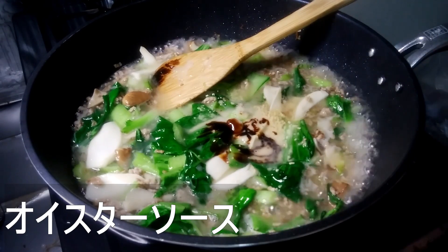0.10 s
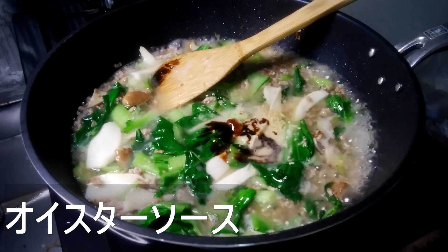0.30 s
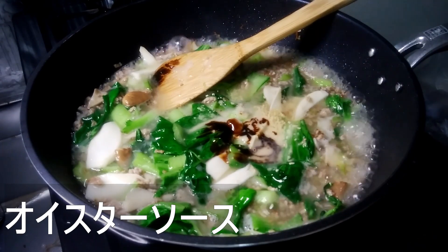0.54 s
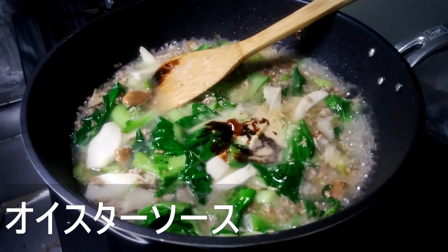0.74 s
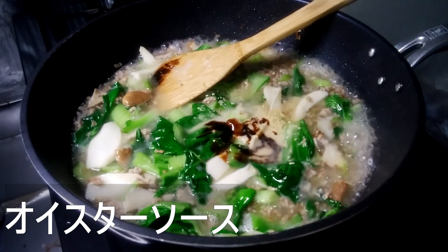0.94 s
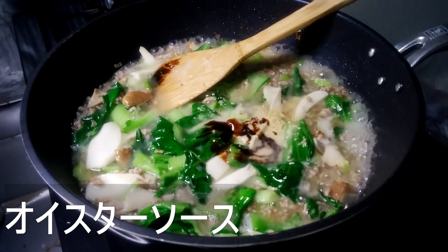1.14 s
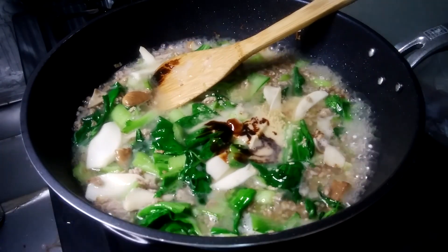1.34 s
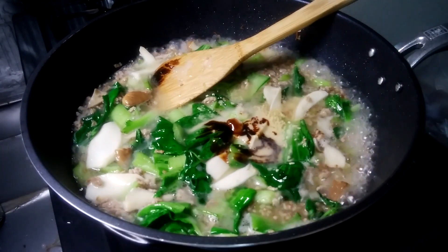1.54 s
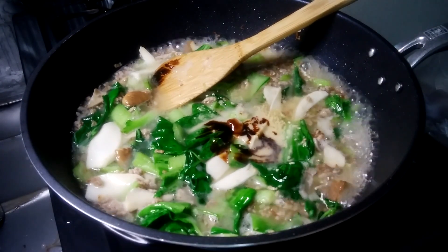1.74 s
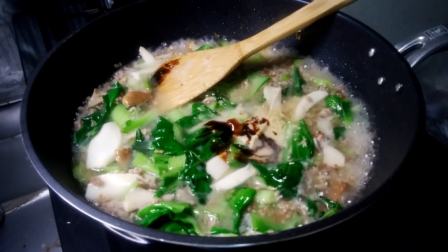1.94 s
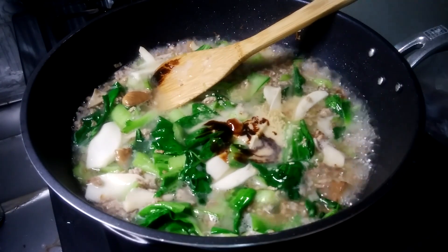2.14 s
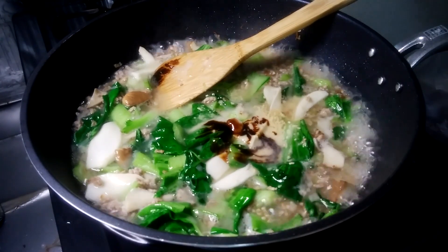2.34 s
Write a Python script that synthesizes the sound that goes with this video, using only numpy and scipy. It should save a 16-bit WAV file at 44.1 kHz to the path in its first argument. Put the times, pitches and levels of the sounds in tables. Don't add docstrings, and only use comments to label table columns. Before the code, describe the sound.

Two heavy cupboard bangs with rattling fittings, then a sharp cap snap, beside a softly simmering pan

```python
import sys
import numpy as np
from scipy import signal
from scipy.fft import rfft, irfft, next_fast_len
from scipy.io import wavfile
from scipy.ndimage import uniform_filter1d, minimum_filter1d, map_coordinates

SR = 44100
rng = np.random.default_rng(int(sys.argv[2]) if len(sys.argv) > 2 else 0)


def materialize(psi):
    bounded = np.clip(np.atleast_2d(psi).T, -1, 1)
    quanta = np.round(bounded * 32767).astype(np.int16)
    wavfile.write(sys.argv[1], SR, quanta)


def gain_from_decibels(decibels):
    exponent = np.asarray(decibels, float) / 20
    return 10 ** exponent


N = 110250
T = np.arange(N) / SR

# frequency [Hz], density [dB per Hz].
SIZZLE_SPECTRUM = [(3500, -32.5), (6100, -16), (7500, 0.5), (8900, -5), (10500, 0.5), (12600, -15.5),
                   (14800, -9.5), (16000, -12)]
# centre [Hz], width [Hz], level [dB].
BOTTLE_BODY = [(613, 230, -2), (950, 310, 0), (1410, 310, -7), (1750, 250, -11.5), (2420, 700, -17)]


def unit(x):
    return x / np.sqrt(np.mean(x ** 2) + 1e-20)


def along(points, hz):
    f, v = np.transpose(points)
    return np.interp(np.log(hz + 1), np.log(f + 1), v)


def wobble(rate_hz):
    knots = rng.standard_normal(int(N * rate_hz / SR) + 4)
    return map_coordinates(knots, [T * rate_hz])


def swaying_tone(pitch_hz):
    return np.sin(2 * np.pi * np.cumsum(pitch_hz) / SR)


def filtered(x, response):
    m = next_fast_len(N + SR // 2)
    return irfft(rfft(x, m) * response(np.fft.rfftfreq(m, 1 / SR)), m)[:N]


def noise(spectrum, patchy_db=0.):
    z = signal.stft(rng.standard_normal(N + 512), nperseg=512)[2]
    field = uniform_filter1d(rng.standard_normal(z.shape), size=6, axis=0)
    field = uniform_filter1d(field, size=10, axis=1)
    x = signal.istft(z * gain_from_decibels(patchy_db * unit(field)), nperseg=512)[1][:N]
    return unit(filtered(x, lambda hz: gain_from_decibels(along(spectrum, hz))))


def body(modes):
    def gain(f):
        total = 0
        for k, (centre, width, db) in enumerate(modes):
            damping = 1j * f * width
            total = total + (-1) ** k * gain_from_decibels(db) * damping / (centre ** 2 - f * f + damping)
        return total

    norm = np.sqrt(np.mean(np.abs(gain(np.linspace(0, SR / 2, num=20000))) ** 2))
    return lambda f: gain(f) / norm


def grains(count, hz, spread, cycles, spread_db, glide):
    u, g, k = rng.random((count, 2)), rng.standard_normal((count, 1)), np.arange(400)
    turns = hz * np.exp(spread * g) * k / SR
    level = gain_from_decibels(-spread_db * np.log(u[:, 1:] + .02))
    envelope = (turns / 2).clip(0, 1) * np.exp(-3 * turns / cycles)
    rows = level * envelope * np.sin(2 * np.pi * turns * (1 + glide * turns / cycles))
    starts = (u[:, :1] * N).astype(int)
    return unit(np.bincount((starts + k).ravel(), rows.ravel(), N + 400)[:N])


def clicks(table, crack, modes):
    bright, hollow = np.zeros(N), np.zeros(N)
    for s, db, rise, t60, share in table:
        t = (T - s).clip(0)
        burst = gain_from_decibels(db - 60 * (t - rise).clip(0) / t60) * (t / rise).clip(0, 1) ** 2 / 2
        share = np.clip(share, 0, 1)
        bright += burst * np.sqrt(1 - share)
        hollow += burst * np.sqrt(share)
    return bright * noise(crack, patchy_db=1.5) + filtered(hollow * rng.standard_normal(N), body(modes))


def pings(table, rise_s, climb):
    out = np.zeros(N)
    for s, db, hz, t60 in table:
        t = (T - s).clip(0)
        envelope = gain_from_decibels(db - 60 * t / t60) * (1 - np.exp(-t / rise_s))
        out += envelope * np.sin(2 * np.pi * hz * t * (1 + climb * t / t60))
    return out


def cupboard():
    # time [s], level [dB], share on the deep carcass [0-1].
    surges = [
        [(.2195, -23, 0), (.225, -11.5, 0.16), (.25, -4, 0.25), (.29, -10, 0.88), (.325, -14.5, 0.94),
         (.34, -24.5, 0.4), (.348, -37, 0.4)],
        [(.346, -37, 1), (.353, -13, 0.04), (.383, -20.5, 0), (.391, 1.5, 0.9), (.403, -36.5, 0.86)],
        [(.398, -42, 0.4), (.405, -15.5, 0.5), (.47, -15.5, 0.28), (.55, -22.5, 0.57), (.585, -32, 0.52),
         (.72, -44.5, 0.53), (.76, -39.5, 0), (.81, -49, 1)],
        [(1.005, -38, 0.14), (1.012, -16, 0.15), (1.024, -14.5, 0.81), (1.064, -12.5, 0.9), (1.072, -27, 0.34),
         (1.12, -29, 0.8), (1.16, -35.5, 0.79), (1.3, -59, 0.64)],
    ]
    # centre [Hz], width [Hz], level [dB].
    carcass_modes = [(50, 16, -7), (68.3, 13.1, -5.5), (92.8, 15.6, -1.5), (148.4, 15.6, -2.5)]
    door_modes = [(182.3, 7.8, -4), (222, 45, -6.5), (319.3, 33.6, -1), (400, 72, -10.5), (479, 42.6, -12),
                  (647, 106, -22), (912, 150, -26), (1400, 480, -35.5)]
    # frequency [Hz], level [dB].
    rattle_spectrum = [(500, -16), (1000, 21.5), (1900, 17), (3200, 0), (4500, -12), (9000, -2),
                       (15000, -3)]
    rattle_db = -23
    force, deep = np.zeros(N), np.zeros(N)
    for s, db, share in map(np.transpose, surges):
        force += gain_from_decibels(np.interp(T, s, db, -120, -120))
        deep = np.maximum(deep, np.interp(T, s, np.clip(share, 0, 1), 0, 0))
    carcass = unit(filtered(rng.standard_normal(N), body(carcass_modes)))
    door = unit(filtered(rng.standard_normal(N), body(door_modes)))
    rattle = gain_from_decibels(rattle_db + 1.8 * wobble(123.2)) * (1 - deep) * noise(rattle_spectrum)
    return force * (np.sqrt(deep) * carcass + np.sqrt(1 - deep) * door + rattle)


def door_latch():
    # start [s], peak [dB], rise [s], t60 [s], share of hollow body [0-1].
    contacts = [(.2203, -5, 0.000096, 0.021, 0.37), (.235, -20.5, 0.017, 0.32, 0.4),
                (.2524, -9.5, 0.00098, 0.079, 0.91), (.279, -21, 0.00088, 0.037, 1),
                (.3477, -22.5, 0.0003, 0.017, 0.77), (.366, -22, 0.0015, 0.012, 0.3),
                (.4021, -19, 0.0002, 0.016, 0.58), (.424, -26, 0.00064, 0.032, 0.7),
                (1.0052, -17, 0.00052, 0.023, 0.28), (1.0102, -16, 0.00023, 0.013, 0.37),
                (1.015, -25, 0.00098, 0.016, 1)]
    # frequency [Hz], level [dB].
    latch_spectrum = [(900, -30), (2500, -18), (5000, -12), (7600, 0), (10500, 2.5), (12500, -12),
                      (14500, -4), (16000, -31)]
    # centre [Hz], width [Hz], level [dB].
    latch_modes = [(925, 400, 4), (1490, 230, -0.5), (1870, 156, 0), (2670, 180, -5.5), (2900, 230, -5)]
    return clicks(contacts, latch_spectrum, latch_modes)


def door_panel():
    # time [s], pitch [Hz], level [dB].
    song = [(.349, 341.5, -58), (0.357, 340, -11), (.38, 316, -22), (.389, 309, -15), (0.405, 323, -14),
            (.47, 318.3, -27), (.494, 337.5, -43), (0.541, 311, -13.5), (0.584, 311, -44)]
    s, hz, db = np.transpose(song)
    level_db = np.interp(T, s, db, -120, -120) + 1.5 * wobble(57.9)
    return gain_from_decibels(level_db) * swaying_tone(np.interp(T, s, hz) + 6 * wobble(50.2))


def struck_fittings():
    # start [s], peak [dB], frequency [Hz], t60 [s].
    strikes = [(.2205, -11, 1864, 0.016), (.2205, -24, 2400, .015), (.2205, -19, 7650, 0.021),
               (.227, -9.5, 350, 0.048), (.2524, -24, 950, 0.026), (.279, -28, 1890, .03),
               (.3485, -34, 1840, 0.042), (.366, -30, 3300, 0.017), (.4021, -27.5, 2720, 0.017),
               (.4025, -31, 1883, 0.045), (1.0052, -12, 10240, 0.015), (1.008, -23, 317, .08),
               (1.011, -16, 433, 0.064), (1.0115, -20, 900, 0.052), (1.012, -23.5, 1316, 0.038),
               (1.0105, -29, 1890, 0.035), (1.0105, -26, 4670, 0.013), (1.7715, -21.5, 950, 0.015),
               (1.7715, -37, 1660, 0.034), (1.8025, -20, 2940, 0.012), (1.8025, -20, 7200, .01),
               (1.8063, 0, 945, 0.0069), (1.8065, -23, 2180, .02), (1.818, -26.5, 830, 0.012)]
    return pings(strikes, rise_s=.0005, climb=0)


def bottle_contacts():
    # start [s], peak [dB], rise [s], t60 [s], share of hollow body [0-1].
    contacts = [
        (1.662, -17.5, 0.0047, 0.057, 0.05),
        (1.707, -19.5, 0.0041, 0.034, 0.07),
        (1.8024, -2, 0.00053, 0.017, 0.15),
        (1.8058, -12.5, 0.00071, 0.031, 0.93),
        (2.2454, -33, 0.0015, 0.017, 0),
    ]
    # frequency [Hz], level [dB].
    cap_spectrum = [(900, -31), (2300, -5), (3800, -7), (5600, -0.5), (7500, 2), (10500, 0.5), (12500, -14),
                    (14500, -14)]
    return clicks(contacts, cap_spectrum, BOTTLE_BODY)


def rubs():
    # start [s], length [s], level [dB].
    strokes = [
        (0.197, 0.11, -48.5),
        (0.713, 0.057, -53),
        (1.358, 0.049, -48),
        (1.459, 0.03, -50.5),
        (2.215, 0.037, -44),
        (2.369, 0.032, -54),
    ]
    # centre [Hz], width [Hz], level [dB].
    rub_modes = [(900, 100, 2.5), (1760, 150, -0.5), (2550, 860, -6.5), (3300, 290, -0.5),
                 (4260, 750, -9.5), (8350, 3200, -10)]
    rise_s, fall_s = 0.0038, 0.0086
    stroke = np.zeros(N)
    for s, length, db in strokes:
        stroke += gain_from_decibels(db) * np.minimum((T - s) / rise_s, (s + length - T) / fall_s + 1).clip(0, 1)
    grit = gain_from_decibels(2.5 * wobble(150)) * rng.standard_normal(N)
    return filtered(stroke * grit, body(rub_modes))


def knocks():
    # start [s], level [dB], length [s], frequency [Hz].
    worktop_knocks = [(1.151, -24.5, 0.011, 160), (1.189, -28.5, 0.012, 150), (1.286, -42, 0.0086, 400),
                      (1.477, -37.5, 0.038, 289.3), (1.553, -30.5, 0.022, 275.7), (1.576, -37, 0.044, 323),
                      (1.675, -40, 0.017, 277.7), (2.31, -31, 0.024, 292), (2.375, -42, 0.045, 302)]
    spread, rise_s = 0.13, 0.0033
    out = np.zeros(N)
    for s, db, length, hz in worktop_knocks:
        side_hz = hz * np.exp(spread * rng.standard_normal(2)) * [.8, 1.4]
        ring = np.sin(2 * np.pi * hz * T)
        for mode_hz in side_hz:
            ring += 0.39 * np.sin(2 * np.pi * mode_hz * T)
        out += ((T - s) / rise_s).clip(0, 1) * gain_from_decibels(db) * np.exp(-((T - s) / length) ** 2) * ring
    return out


def room(x):
    # frequency [Hz], t60 [s].
    decay = [(300, 0.27), (1000, 0.29), (5000, 0.32), (10000, 0.16), (13000, 0.18)]
    hz, t, z = signal.stft(np.array([x, rng.standard_normal(N)]), SR, nperseg=256)
    keep = gain_from_decibels(-120 * (t[1] - t[0]) / along(decay, hz))
    energy = [signal.lfilter([0, 1 - k], [1, -k], np.abs(row) ** 2) for k, row in zip(keep, z[0])]
    diffuse = unit(np.abs(z[1])) * np.exp(1j * np.angle(z[1]))
    return signal.istft(np.sqrt(energy) * diffuse, SR, nperseg=256)[1][:N]


def simmer():
    # time [s], simmer strength [dB].
    strength = [(0.0, -47.5), (0.12, -44), (0.35, -43), (0.54, -45), (1.37, -44.5), (1.89, -42.5),
                (2.18, -46.5), (2.5, -45)]
    spit_db, bubble_db = -6, -58
    spits = grains(count=1500, hz=8500, spread=.35, cycles=4, spread_db=3.5, glide=0)
    spits = unit(filtered(spits, lambda hz: gain_from_decibels(along(SIZZLE_SPECTRUM, hz) * .8)))
    fizz = gain_from_decibels(.8 * wobble(12) + .6 * wobble(45)) * noise(SIZZLE_SPECTRUM, patchy_db=.6)
    bubbles = grains(count=900, hz=1000, spread=.45, cycles=8, spread_db=2.2, glide=.12)
    level = gain_from_decibels(np.interp(T, *np.transpose(strength)))
    return level * (fizz + gain_from_decibels(spit_db) * spits) + gain_from_decibels(bubble_db) * bubbles


def fat_spits():
    # start [s], peak [dB], t60 [s].
    sharp_spits = [(0.0177, -31, 0.013), (.7128, -31.5, 0.073), (1.293, -28, 0.018), (1.3676, -29, 0.13),
                   (2.025, -27, .006), (2.082, -27, 0.016), (2.3805, -33, 0.05)]
    rise_s = .0005
    contacts = [(s, db, rise_s, t60, 0) for s, db, t60 in sharp_spits]
    return clicks(contacts, SIZZLE_SPECTRUM, BOTTLE_BODY)


def single_bubbles():
    # start [s], peak [dB], frequency [Hz], t60 [s].
    blips = [(.075, -41, 1024, 0.056), (.976, -37.5, 965, 0.032), (1.245, -48.5, 1750, 0.1),
             (1.292, -40, 620, 0.054), (1.3, -44.5, 972, 0.15), (1.37, -37, 803, .06),
             (1.475, -44, 900, .12), (1.485, -46, 1580, .12), (2.005, -42.5, 1626, 0.078),
             (2.08, -45.5, 2950, 0.055), (2.14, -57, 540, 0.054), (2.237, -43, 1700, 0.057),
             (2.306, -41.5, 786, 0.11), (2.312, -41.5, 1870, .06), (2.336, -30, 283, 0.081),
             (2.34, -52, 886, 0.34), (2.38, -37.5, 2190, 0.06), (2.378, -46, 2550, 0.094),
             (2.435, -45, 623, 0.092)]
    return pings(blips, rise_s=0.0015, climb=0.028)


def extractor_hum():
    # time [s], level [dB].
    hum_level = [(0, -75), (.9, -60), (1.4, -50), (1.9, -45.5), (2.12, -46.5), (2.22, -47.5), (2.5, -50)]
    low_hz, high_hz, high_db = 62, 101, -4.5
    hum = gain_from_decibels(1.5 * wobble(11)) * swaying_tone(low_hz + 7 * wobble(14))
    hum += gain_from_decibels(high_db + 2.6 * wobble(6.7)) * swaying_tone(high_hz + 5 * wobble(14))
    return gain_from_decibels(np.interp(T, *np.transpose(hum_level))) * unit(hum)


def cookware_ring():
    # start [s], frequency [Hz].
    pots = [
        (1.803, 490),
        (1.29, 552),
    ]
    level_db, t60_s = -54.5, 9.6
    out = np.zeros(N)
    for s, hz in pots:
        out += (T > s) * gain_from_decibels(level_db - 60 * (T - s).clip(0) / t60_s) * np.sin(2 * np.pi * hz * T)
    return out


def room_air():
    # time [s], level [dB].
    air_level = [(0, -48.5), (.2, -45), (.9, -47), (1.25, -46.5), (1.6, -43.5), (1.9, -44.5), (2.15, -48.5),
                 (2.35, -40.5), (2.5, -49)]
    # frequency [Hz], density [dB per Hz].
    air_spectrum = [(15, -45), (28, -33), (64, -10), (162, -19.5), (245, -16), (491, -30), (524, -25),
                    (1100, -31.5), (4500, -43.5), (5850, -56), (9900, -120)]
    air = gain_from_decibels(1.2 * wobble(14)) * noise(air_spectrum, patchy_db=2.2)
    return gain_from_decibels(np.interp(T, *np.transpose(air_level))) * air


def scene():
    bottle_wet_db, latch_wet_db, struck_wet_db = -3, -9.5, -17
    bottle = bottle_contacts() + rubs()
    latch = door_latch()
    struck = struck_fittings()
    wet = gain_from_decibels(bottle_wet_db) * room(bottle)
    wet += gain_from_decibels(latch_wet_db) * room(latch)
    wet += gain_from_decibels(struck_wet_db) * room(struck)
    door = cupboard() + latch + door_panel()
    pan = simmer() + fat_spits() + single_bubbles()
    background = extractor_hum() + cookware_ring() + room_air()
    return (door + struck + bottle + knocks() + wet + pan + background)[None]


def low_pass(x):
    return signal.sosfilt(signal.butter(12, 16820, fs=SR, output="sos"), x)


def record(dry):
    limit_db, hold_s = -9.3, .008
    clip_top, clip_knee = .5, 4
    top_hz, over_top_db = 15750, -36
    span = round(hold_s * SR)
    need = np.minimum(1, gain_from_decibels(limit_db) / (np.abs(dry) + 1e-9))
    x = dry * uniform_filter1d(minimum_filter1d(need, span, axis=1), span, axis=1)
    x = x / (1 + np.abs(x / clip_top) ** clip_knee) ** (1 / clip_knee)
    x = filtered(x[0], lambda hz: np.where(hz < top_hz, 1, gain_from_decibels(over_top_db)))[None]
    return low_pass(x)


dry = scene()
out = record(dry)
materialize(out)
```